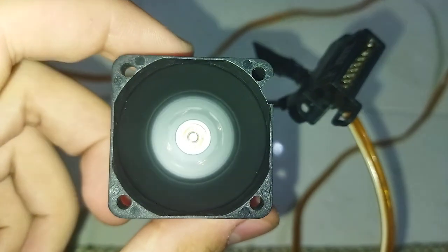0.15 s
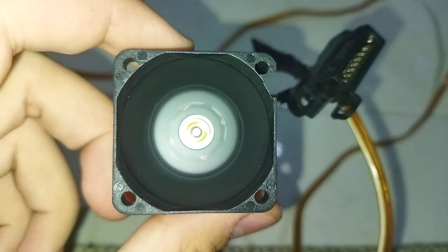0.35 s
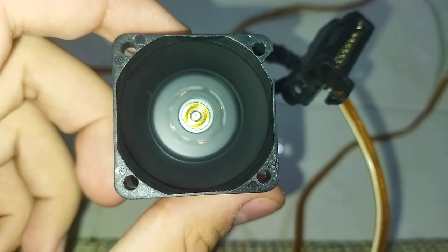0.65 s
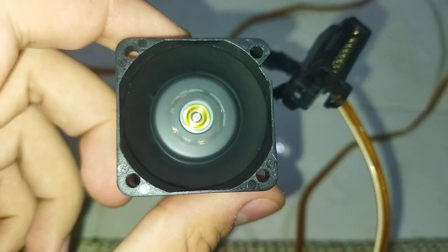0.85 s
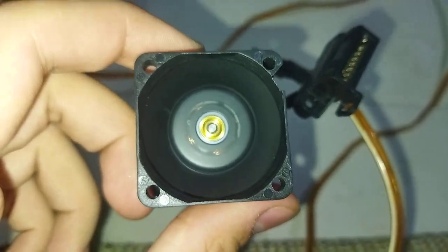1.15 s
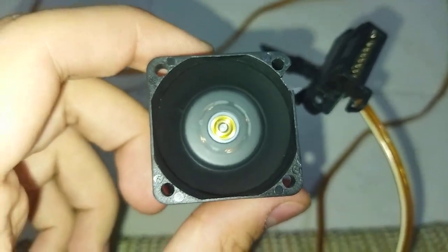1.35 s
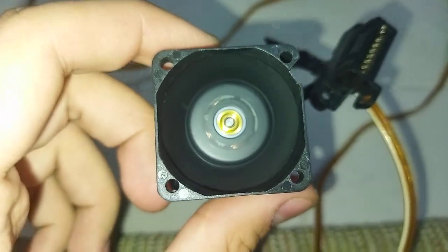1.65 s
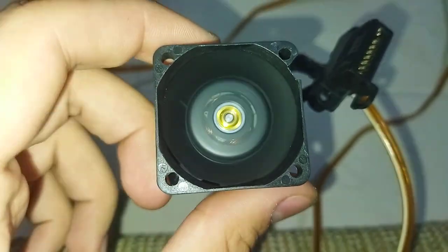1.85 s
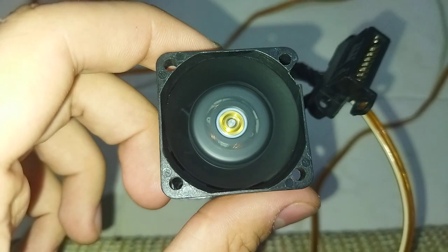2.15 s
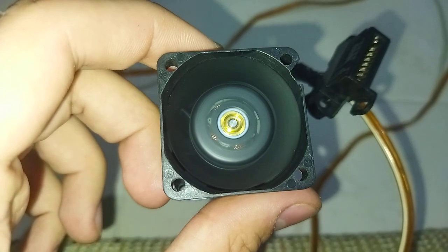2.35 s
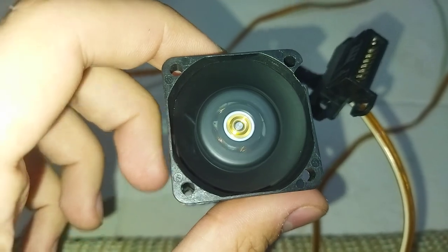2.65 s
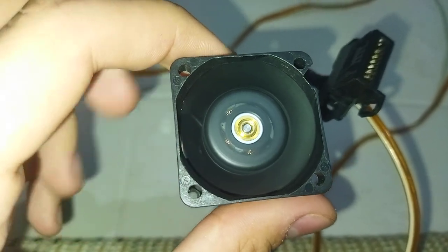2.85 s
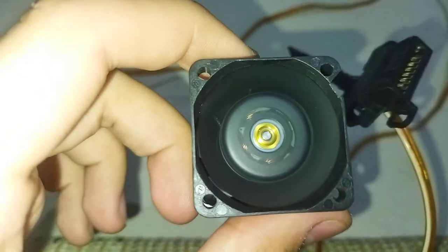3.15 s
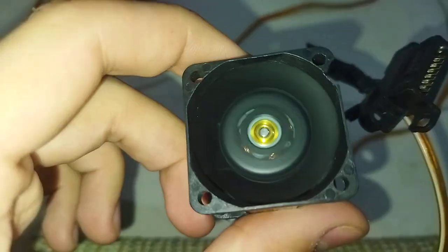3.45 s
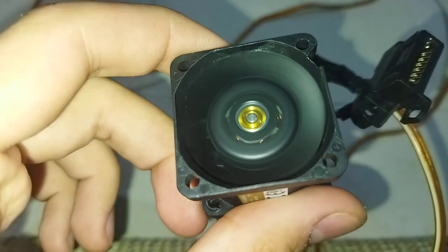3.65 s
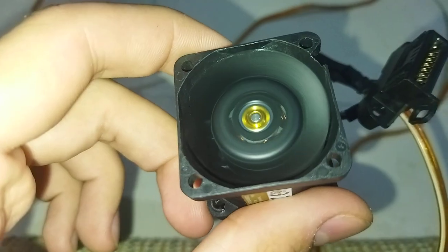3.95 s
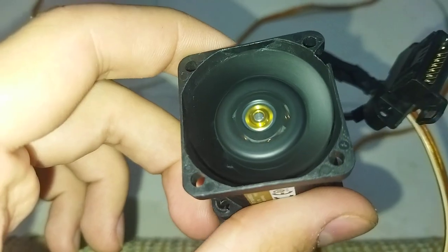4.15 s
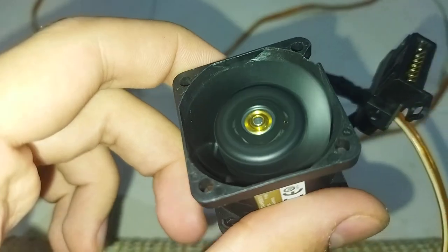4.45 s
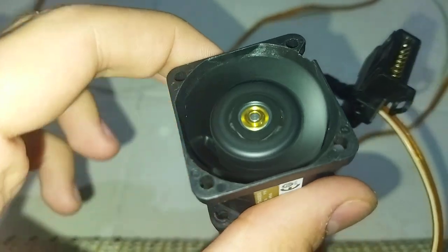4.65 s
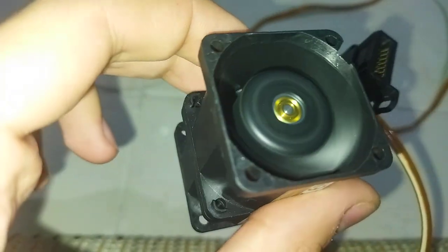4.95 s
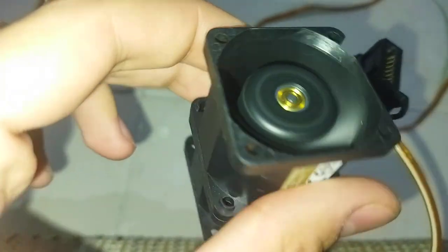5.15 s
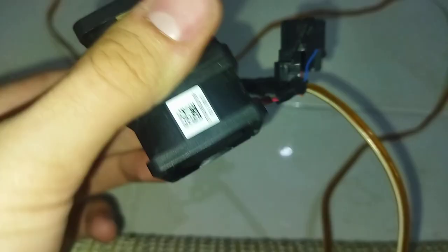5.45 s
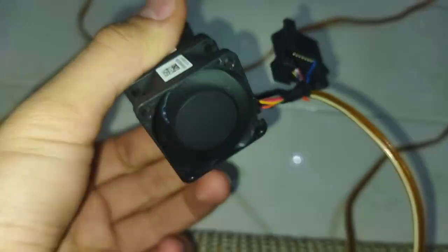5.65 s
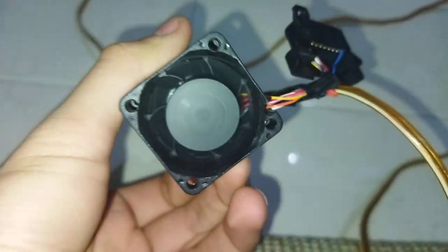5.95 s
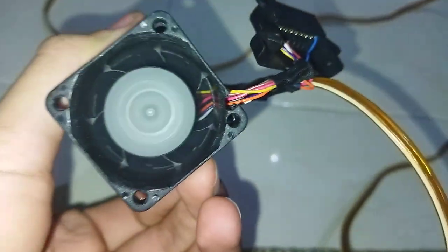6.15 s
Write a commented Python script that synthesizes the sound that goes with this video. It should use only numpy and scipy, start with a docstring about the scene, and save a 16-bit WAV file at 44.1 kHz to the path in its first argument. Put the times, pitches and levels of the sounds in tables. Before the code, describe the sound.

Close, dry sound of a powerful little cooling fan revving up: a buzzing, siren-like whine rises fast, levels off and holds, with several slightly beating high tones inside a bright rush of air. The tones waver and shift between left and right. In the last second the fan is rotated, the side hum swells briefly, and air blasts the microphone with a distorted, pumping wind roar that smothers the whine.

```python
"""A small hand-held fan with two counter-rotating rotors spins up close to a two-port microphone.
Three front and five rear blades whine as speed-locked sines, with wake tones where rear blades cut front wakes.
Shaped noise is the air rushing through the frame; weaker side tones and a hum per shaft lie beneath.
At the end the fan is turned round: its jet buffets the ports as bands of noise.
The recorder ducks each channel when its bass overloads, rounds the peaks and cuts the top."""
import sys
import numpy as np
from scipy import signal
from scipy.fft import rfft, irfft, next_fast_len
from scipy.io import wavfile

SR = 44100
rng = np.random.default_rng(int(sys.argv[2]) if len(sys.argv) > 2 else 0)


def dump_mix(stems):
    """Bounce the given channels to the path in sys.argv[1] as a 16-bit WAV at rate SR."""
    frames = np.atleast_2d(stems).T  # one column per channel
    limited = np.clip(frames, -1, 1)  # hard clip at full scale
    pcm = np.round(limited * 32767).astype(np.int16)
    wavfile.write(sys.argv[1], SR, pcm)


N = 276948

# mean shaft speeds: (time [s], front [turns/s], rear [turns/s])
SPEED = [(0.0, 187.0, 230.0), (0.23, 222.0, 263.4), (0.39, 245.9, 276.4), (0.5, 259.7, 286.3),
         (0.6, 269.9, 291.8), (0.78, 284.0, 301.1), (0.95, 292.3, 308.0), (1.56, 314.4, 331.8),
         (1.75, 320.9, 337.6), (1.95, 324.6, 344.1), (2.34, 329.8, 354.7), (2.55, 331.1, 357.0),
         (2.9, 332.3, 358.2), (3.74, 332.4, 361.1), (4.87, 332.4, 361.5), (5.33, 332.4, 359.4),
         (5.85, 330.7, 361.1), (6.27, 331.2, 361.9)]
# the hand turns the fan round: (time [s], angle [deg]; 0 = intake faces the ports, 180 = outlet does)
TURN = [(0, 0), (3.4, 1), (3.75, 16), (4.9, 24), (5.31, 52), (5.54, 90), (5.72, 138), (5.9, 180)]
# broad rush, rows left and right port: (power of speed, change edge-on [dB], change from behind [dB])
RUSH = [(1.6, -1, -.5), (2.5, -1.5, -1.3)]


def from_db(db):
    """Decibels to gain."""
    return 10 ** (np.asarray(db) / 20)


def rms_one(x):
    """Scale to rms 1."""
    return x / np.sqrt(np.mean(x ** 2) + 1e-20)


def in_time(rows):
    """The columns of a curve at every sample."""
    s, *columns = np.transpose(rows)
    t = np.arange(N) / SR
    return np.array([np.interp(t, s, c) for c in columns])


def at_hz(rows, hz):
    """The columns of a spectrum at given frequencies, joined on a log axis."""
    points_hz, *columns = np.transpose(rows)
    return np.array([np.interp(np.log(hz), np.log(points_hz), c) for c in columns])


def drift(rate_hz):
    """Slow noise of rms about 1: white noise through two equal poles at rate_hz."""
    step, settle = 40, 2000  # audio samples per slow sample; slow samples dropped
    r = np.exp(-2 * np.pi * rate_hz * step / SR)
    white = rng.standard_normal(N // step + 2 + settle)
    slow = rms_one(signal.lfilter([1], [1, -2 * r, r * r], white)[settle:])
    return np.interp(np.arange(N) / step, np.arange(len(slow)), slow)


def smooth(x, seconds):
    """One-pole average."""
    r = np.exp(-1 / (seconds * SR))
    return signal.lfilter([1 - r], [1, -r], x)


def shaft_angles(wander=.0002):
    """Angle of each rotor [rad], the integral of its speed; the speeds waver by a small rms share."""
    speeds = in_time(SPEED) * (1 + wander * np.array([drift(9.5), drift(8.2)]))
    return 2 * np.pi * np.cumsum(speeds, axis=1) / SR


def pose(edge_sharpness=6):
    """Front rotor speed [dB re full], and how far the fan is seen edge-on and from behind (0-1)."""
    speed = in_time(SPEED)[0]
    turn = np.radians(in_time(TURN)[0])
    speed_db = 20 * np.log10(speed / speed.max())
    edge_on = np.abs(np.sin(turn)) ** edge_sharpness  # a higher power narrows the zone
    behind = np.maximum(-np.cos(turn), 0)
    return np.array([speed_db, edge_on, behind])


def tone(angles, order, left_db, right_db, left_lead_rad, flutter_db, flutter_hz=9.0):
    """A sine locked to whole multiples of both shafts; uneven inflow makes its level flutter."""
    phase = np.dot(order, angles) + rng.uniform(0, 2 * np.pi)
    gain = from_db(np.array([left_db, right_db]) + flutter_db * drift(flutter_hz))
    return np.sqrt(2) * gain * np.sin([phase + left_lead_rad, phase])


def hum(angles, state):
    """Unbalance makes each shaft hum once per turn, loudest from the side."""
    # at full speed, intake facing: (front order, rear order, left [dB], right [dB], left lead [rad],
    # power of speed, left gain side-on [dB], right gain side-on [dB])
    hums = [(0, 1, -45, -46, 2.85, 2, 9.5, .5), (1, 0, -62, -61, 1, 1, 13, 11)]
    side_on = np.sin(np.radians(in_time(TURN)[0]))
    out = 0
    for front, rear, left_db, right_db, lead_rad, power, left_side_db, right_side_db in hums:
        speed_db = power * state[0]
        left = left_db + speed_db + left_side_db * side_on
        right = right_db + speed_db + right_side_db * side_on
        out = out + tone(angles, (round(front), round(rear)), left, right, lead_rad, flutter_db=1.1)
    return out


def side_tones(angles, state, fade_db=3.0, trim_db=-0.9, extra_speed_power=.7):
    """Bearing, motor and wake tones grow with speed and fade in and out at each port."""
    # at full speed, before trim_db: (front shaft order, rear shaft order, left [dB], right [dB])
    weak_tones = [(-3, 5, -56, -70), (9, -5, -48, -56), (0, 4, -49, -51), (6, -1, -49, -66),
                  (3, 3, -45, -47), (3, 4, -54, -44), (0, 7, -47, -41), (6, 2, -41, -40),
                  (3, 5, -38.5, -40), (0, 8, -42, -46), (12, 0, -42, -42), (0, 13, -43, -53),
                  (9, 5, -37, -41), (15, 0, -41, -41), (0, 14, -42, -44), (18, 0, -45, -46),
                  (9, 10, -44, -45), (15, 5, -39, -40), (0, 20, -39, -43), (18, 5, -40, -49),
                  (21, 5, -38, -54), (18, 10, -38, -55), (0, 30, -39, -56)]
    out = np.zeros((2, N))
    for front_order, rear_order, *port_db in weak_tones:
        phase = front_order * angles[0] + rear_order * angles[1]
        for port, db in enumerate(port_db):
            gain = from_db(db + fade_db * drift(3.2))
            out[port] += gain * np.sin(phase + rng.uniform(0, 2 * np.pi))
    level_db = trim_db + np.dot(RUSH, state) + extra_speed_power * state[0]
    return np.sqrt(2) * from_db(level_db) * out


def buffet(jet, low_hz, steepness, lumpy_db):
    """Eddies of the jet break on one port; they get smaller and the roar brighter with time."""
    start_s, attack_s, start_db, db_per_s, start_hz, hz_per_s = jet
    age_s = np.maximum(np.arange(N) / SR - start_s, 0)
    level_db = start_db + db_per_s * age_s
    corner_hz = start_hz + hz_per_s * age_s
    edges_hz = np.geomspace(25, 6400, num=17)
    white = rng.standard_normal((2, N))
    out, power = 0, 0
    for k, (low, high) in enumerate(zip(edges_hz, edges_hz[1:])):
        hz = np.sqrt(low * high)
        sos = signal.butter(2, [low, high], "band", fs=SR, output="sos")
        band = rms_one(signal.sosfilt(sos, white[k % 2]))  # neighbouring bands use separate noises
        gain = np.sqrt(hz / (1 + (hz / corner_hz) ** steepness)) / (1 + (low_hz / hz) ** 3)
        out = out + gain * band
        power = power + gain ** 2
    attack = np.minimum(age_s / attack_s, 1)
    return attack * from_db(level_db + lumpy_db * drift(35)) * out / np.sqrt(power)


def air(state, hiss_hz=7400, rush_trim_db=-.2, hiss_trim_db=.3, unsteady_db=0.32):
    """Turbulence as shaped noise, partly shared by the ports with a phase lead at the left one."""
    # at full speed, intake facing, before the trims: (frequency [Hz], left [dB per Hz], right [dB per Hz])
    spectrum = [(30, -106, -109), (55, -92, -94), (90, -79, -79), (160, -74.5, -75), (300, -76.5, -79),
                (436, -75.5, -79.5), (715, -69.5, -74), (1460, -65.5, -69.5), (2300, -58.5, -58),
                (2940, -59, -60), (6300, -59.5, -60.5), (7300, -61, -64), (9110, -52.5, -71.5),
                (11100, -61, -73), (11900, -59, -63.5), (15500, -63, -73.5)]
    # how it reaches the ports: (frequency [Hz], likeness [0-1], left lead [rad])
    ports = [(150, 0.78, 0), (684, 0.77, 0.98), (1400, 0.83, 1.5), (2135, 0.77, 3), (2620, 0.8, 5.5),
             (3370, 0.32, 7), (4300, 0.2, 8), (5680, 0.24, 12.5), (7130, 0, 16), (10200, 0, 19)]
    # blade-tip hiss, rows left and right port: (power of speed, change edge-on [dB], change from behind [dB])
    hiss_change = [(2.9, -4, 2.8), (2.5, -1, .8)]
    # the hand brings the outlet closer to the right port: (time [s], gain of the hiss there [dB])
    approach = [(6.0, 0), (6.27, 4.5)]
    size = next_fast_len(N)
    hz = np.arange(size // 2 + 1) * SR / size + 1e-3
    likeness, lead_rad = at_hz(ports, hz)
    shared = np.clip(likeness, 0, 1)
    left, own = rfft(rng.standard_normal((2, size)))
    right = shared * left * np.exp(-1j * lead_rad) + np.sqrt(1 - shared ** 2) * own
    noise = np.array([left, right]) * from_db(at_hz(spectrum, hz)) * np.sqrt(SR / 2)
    low = 1 / (1 + (hz / hiss_hz) ** 8)
    rush_db = rush_trim_db + np.dot(RUSH, state)
    hiss_db = hiss_trim_db + np.dot(hiss_change, state) + np.outer([0, 1], in_time(approach))
    rush = irfft(noise * low, size)[:, :N] * from_db(rush_db)
    hiss = irfft(noise * (1 - low), size)[:, :N] * from_db(hiss_db)
    return (rush + hiss) * from_db(unsteady_db * drift(10))  # the inflow is slightly unsteady


def whine(angles, state, lead_per_db=.016):
    """Blade-passing and wake tones follow speed by a power law; each has its own beam and port phase."""
    # at full speed, intake facing, before swell and aim; front order 3 and rear order 5 are blade passing,
    # mixed orders are rear blades cutting front wakes:
    # (front order, rear order, left [dB], right [dB], left lead [rad], flutter [dB rms], power of speed,
    # share of the aim, change edge-on [dB], change from behind [dB])
    strong_tones = [(3, 0, -24, -27.8, 1.42, .45, 2.1, 1, -9, -5.5),
                    (6, 0, -24.2, -24.2, 2.98, 1.2, 2.3, 1.25, -12, -14.5),
                    (9, 0, -31.7, -33.3, 6.8, 2.2, .2, 1.05, -2.5, -3),
                    (0, 5, -31.8, -35.6, 1.3, 2.7, 1.9, .9, -6, -11),
                    (0, 10, -36, -37.5, .5, 2.5, 2.7, .3, -4, -5),
                    (0, 15, -39, -30.8, 1.2, 2, 3.4, .4, -5, -10),
                    (6, 5, -36, -32.5, -1.9, 2.6, .5, .7, 6, -11),
                    (12, 5, -36.3, -37.5, .9, 3, 2.1, .5, 4.5, -6)]
    # beamed tones shift balance with the aim: (time [s], change at the right port for a share of 1 [dB])
    aim = [(0, -4), (1.5, -6), (2.05, -5), (2.42, 0), (4.8, 0), (5.5, 1), (5.85, 7)]
    # front blade tone swells and fades: (time [s], level change [dB])
    front_swell = [(4.1, .3), (4.55, -1.3), (5.1, 2), (5.6, 0)]
    # its second harmonic: (time [s], level change [dB])
    second_swell = [(0, -1.5), (.9, .3), (1.3, -2.5), (2.0, 5.5), (2.4, 2.5), (2.95, -3), (3.7, 1.5),
                    (4.5, 3), (4.8, -1), (5.3, 1.5)]
    # its third harmonic: (time [s], level change [dB])
    third_swell = [(.1, -8), (.28, 3.5), (.5, 0), (.73, 7.5), (1.05, 1), (1.3, 4), (1.8, 1.5), (2.15, -10),
                   (2.55, 0), (2.85, -4), (3.7, 3.3), (4.7, 2.3), (5.12, -7), (5.37, 5)]
    # rear blade tone: (time [s], level change [dB])
    rear_swell = [(0, 0), (.4, -5), (1.2, -3.5), (1.6, 1.5), (2.5, -1), (3.15, 5), (4.65, -3), (5.3, 5)]
    swells = {(3, 0): front_swell, (6, 0): second_swell, (9, 0): third_swell, (0, 5): rear_swell}
    aim_db, = in_time(aim)
    # phase lead follows speed; the path difference grows by lead_per_db per dB of aim
    lead_scale = from_db(state[0]) * (1 + lead_per_db * aim_db)
    out = 0
    for front, rear, left_db, right_db, lead_rad, flutter_db, power, aim_share, edge_db, behind_db in strong_tones:
        order = (round(front), round(rear))
        change_db = np.dot([power, edge_db, behind_db], state)
        if order in swells:
            change_db = change_db + in_time(swells[order])[0]
        left = left_db + change_db
        right = right_db + change_db + aim_share * aim_db
        out = out + tone(angles, order, left, right, lead_rad * lead_scale, flutter_db)
    return out


def scene():
    """The fan at both ports, and its jet on them."""
    # jet on the left port: (start [s], attack [s], start level [dB], level slope [dB/s],
    # start eddy corner [Hz], corner rise [Hz/s])
    jet_left = (5.776, .035, -1.2, 22.5, 255, 870)
    # jet on the right port: (start [s], attack [s], start level [dB], level slope [dB/s],
    # start eddy corner [Hz], corner rise [Hz/s])
    jet_right = (5.625, .18, -22, -15, 190, 260)
    angles, state = shaft_angles(), pose()
    jet = np.array([buffet(jet_left, low_hz=126, steepness=4.64, lumpy_db=2.1),
                    buffet(jet_right, low_hz=85, steepness=4.8, lumpy_db=1.5)])
    return hum(angles, state) + side_tones(angles, state) + jet + air(state) + whine(angles, state)


def record(dry, threshold_db=-24, max_duck_db=13.0, bass_hz=600, ceiling=1.0, cutoff_hz=15800):
    """Each channel is turned down when its bass overloads; peaks are rounded and the top is cut."""
    bass = signal.sosfilt(signal.butter(2, bass_hz, fs=SR, output="sos"), dry)
    bass_db = 10 * np.log10(smooth(bass ** 2, seconds=.014) + 1e-12)
    duck_db = smooth(np.clip(bass_db - threshold_db, 0, max_duck_db), seconds=.012)
    limited = ceiling * np.tanh(dry * from_db(-duck_db) / ceiling)
    return signal.sosfilt(signal.ellip(12, .1, 90, cutoff_hz, fs=SR, output="sos"), limited)


dry = scene()
out = record(dry)
dump_mix(out)
```